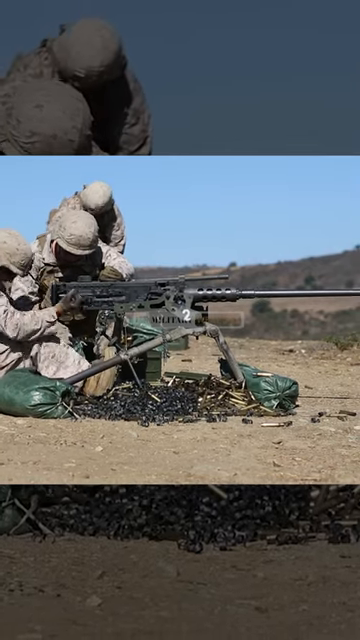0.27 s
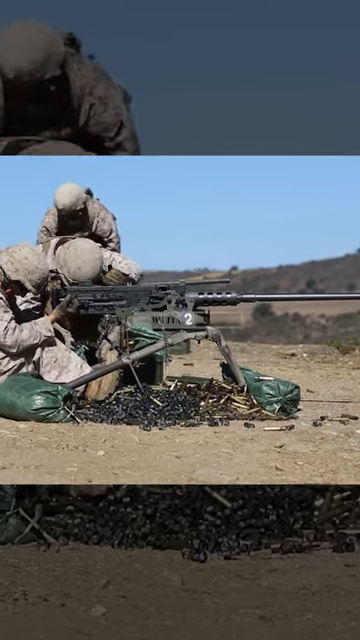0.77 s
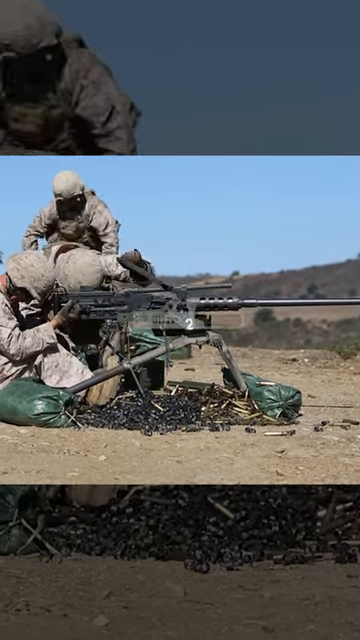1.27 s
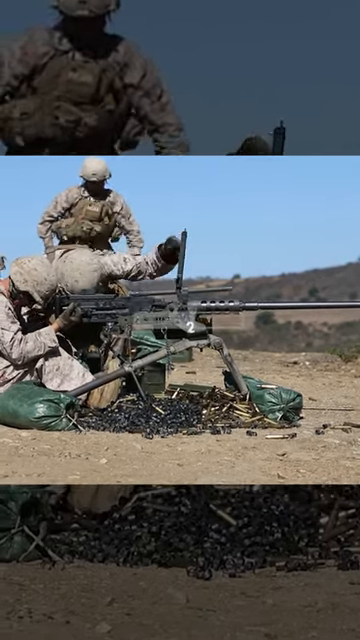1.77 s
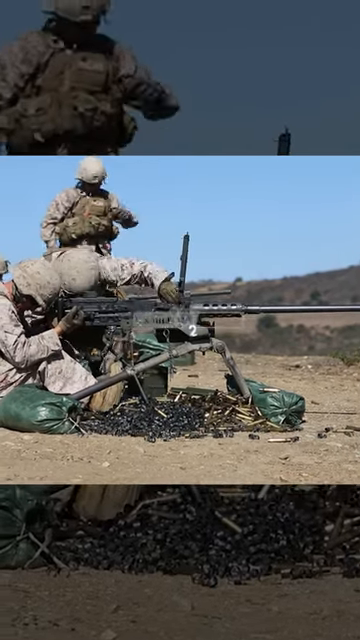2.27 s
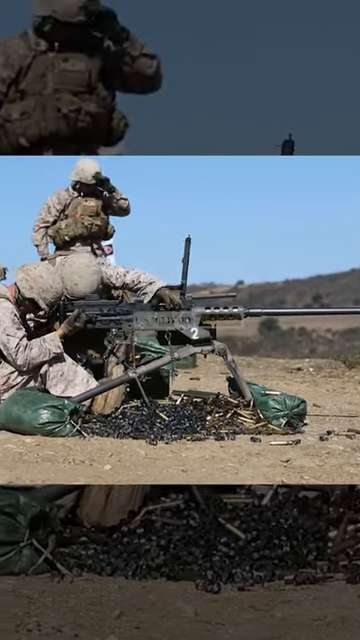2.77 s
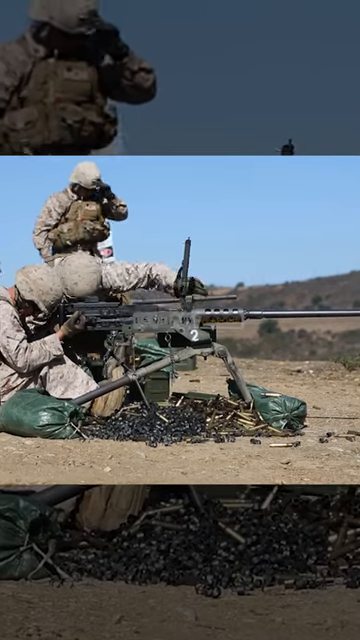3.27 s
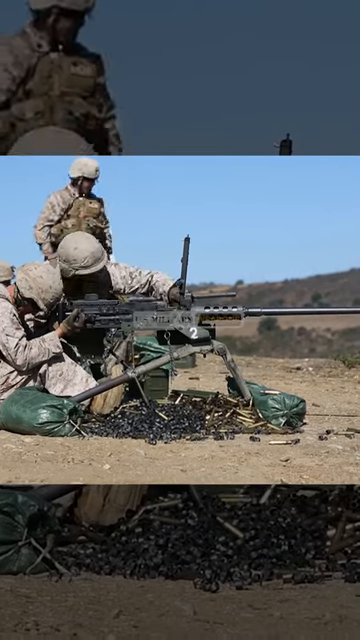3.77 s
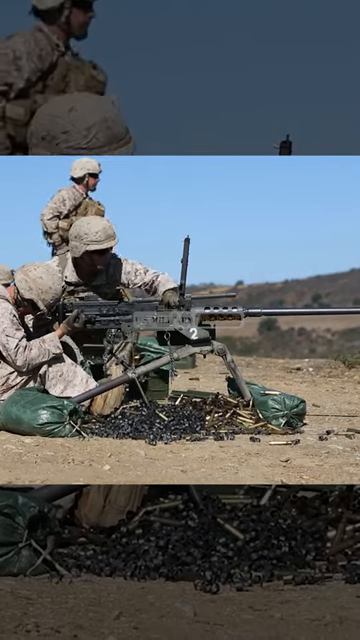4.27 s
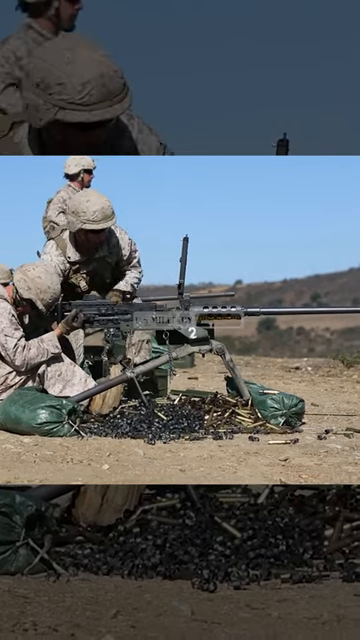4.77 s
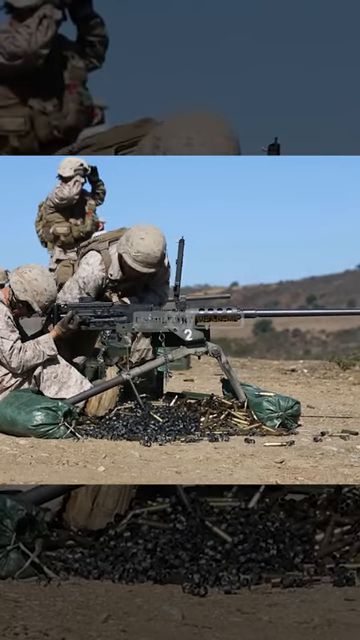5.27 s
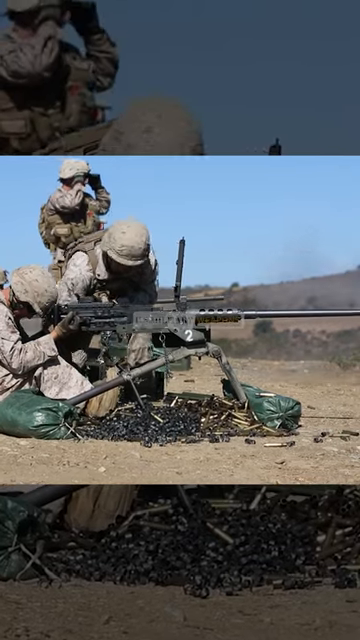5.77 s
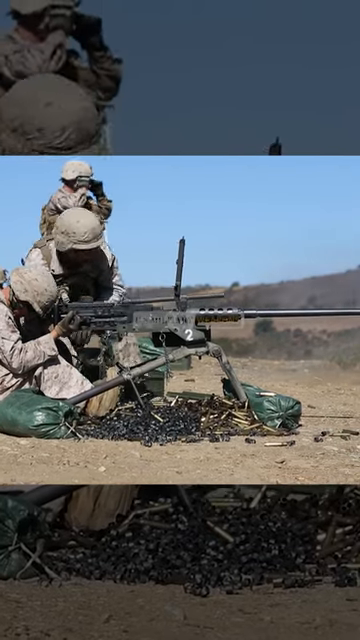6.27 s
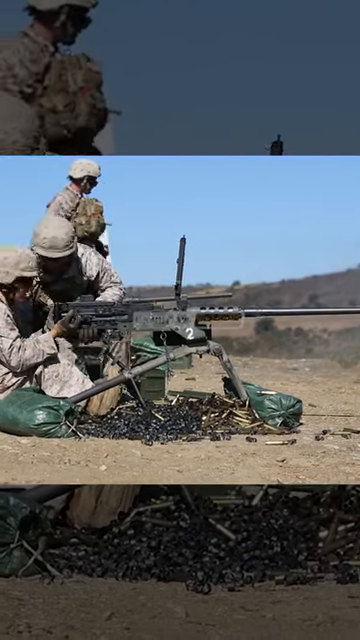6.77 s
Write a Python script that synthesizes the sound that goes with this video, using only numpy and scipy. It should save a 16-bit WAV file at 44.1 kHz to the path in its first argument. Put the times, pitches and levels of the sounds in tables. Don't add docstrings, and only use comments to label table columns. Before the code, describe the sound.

Hard steel clacks, scrapes and snapping latches on a heavy machine gun, tinkling brass, a quiet gap, then an overloaded eleven-shot burst outdoors.

```python
import sys
import numpy as np
from scipy import signal
from scipy.fft import rfft, irfft
from scipy.io import wavfile
from scipy.ndimage import uniform_filter1d

SR = 44100
rng = np.random.default_rng(int(sys.argv[2]) if len(sys.argv) > 2 else 0)


def decibels_to_gain(level_db):
    exponent = np.asarray(level_db, float) / 20
    return 10 ** exponent


def to_wav(s):
    ch = np.atleast_2d(s).T
    pcm = np.round(np.clip(ch, -1, 1) * 32767)
    wavfile.write(sys.argv[1], SR, pcm.astype(np.int16))


N = 309141


def noise():
    return rng.standard_normal(N)


def filtered(x, order, hz, kind="low"):
    return signal.sosfilt(signal.butter(order, hz, kind, fs=SR, output="sos"), x)


def band(x, lo_hz, hi_hz):
    return filtered(x, 2, [lo_hz, min(hi_hz, .45 * SR)], "band")


def level(x, db):
    return x * decibels_to_gain(db) / np.sqrt(np.mean(x ** 2))


def fade60(t, t60):
    return np.exp(-np.log(1000) * t / t60)


def ring(modes, seconds, pitch=1):
    t = np.arange(int(seconds * SR)) / SR
    return sum(decibels_to_gain(db) * np.sin(2 * np.pi * hz * pitch * t) * fade60(t, t60) for hz, db, t60 in modes)


def add(out, s, x):
    i = max(int(s * SR), 0)
    out[i:i + len(x)] += x[:N - i]


def walk(rate):
    k = int(SR / rate)
    steps = np.repeat(rng.standard_normal(N // k + 1), k)
    return 1.13 * uniform_filter1d(uniform_filter1d(steps, k), k)[:N]


# frequency in Hz, level in dB per Hz.
AIR_SPECTRUM = [(12, -41.5), (20, -12), (81, -6.5), (172, -5), (198, -8), (228, -7), (255, -12.5),
                (301, -11), (388, -19), (446, -16.5), (849, -24), (1710, -32.5), (12800, -44.5),
                (14700, -42), (16000, -70)]


def air():
    hz = np.maximum(np.fft.rfftfreq(N, 1 / SR), 1)
    curve_hz, curve_db = np.transpose(AIR_SPECTRUM)
    shape = decibels_to_gain(np.interp(np.log(hz), np.log(curve_hz), curve_db))
    bass_lift = 1 + (75 / np.maximum(hz, 25)) ** 2
    hiss = irfft(rfft(noise()) * shape * bass_lift, N)
    return level(hiss, -36.6) * decibels_to_gain(0.39 * walk(1.49))


# time in seconds, level in dB.
WIND_LEVELS = [(0, -48), (.37, -73), (.62, -50), (1.2, -53), (1.45, -48), (1.95, -56), (2.34, -44),
               (2.8, -73), (3.6, -54), (5.13, -46.5), (5.6, -52), (6.55, -62), (6.85, -55), (7.01, -62)]


def wind():
    times, levels_db = np.transpose(WIND_LEVELS)
    wind_db = np.interp(np.arange(N) / SR, times, levels_db, -60, -60)
    return level(band(noise(), 33, 88.5), 0) * decibels_to_gain(wind_db + 11.5 + 1.5 * walk(6.67))


# centre in Hz, width in Hz, level in dB.
WHINES = [(824, 68, -61.5)]


def engine_whine():
    return sum(level(band(noise(), hz - width / 2, hz + width / 2), db) for hz, width, db in WHINES)


# time in seconds, rate in Hz.
IDLE_RATES = [(0, 22.6), (.5, 23.2), (1.14, 22.7), (3.0, 22.85), (3.9, 22.6), (4.4, 22.3), (5.4, 22.3)]
# multiple of the firing rate, rms level in dB.
IDLE_ORDERS = [(3, -58), (4, -51), (5, -51), (6, -57), (7, -54), (8, -47), (9, -58), (10, -46.5), (11, -58),
               (12, -60), (13, -56), (14, -57), (15, -60), (16, -56)]


def engine_idle():
    times, rates_hz = np.transpose(IDLE_RATES)
    rate_hz = np.interp(np.arange(N) / SR, times, rates_hz) * (1 + .002 * walk(6))
    phase = 2 * np.pi * np.cumsum(rate_hz) / SR
    out = np.zeros(N)
    for order, db in IDLE_ORDERS:
        tone = np.sin(round(order) * phase + 2 * np.pi * rng.random())
        out += np.sqrt(2) * decibels_to_gain(db + 1.8 * walk(3)) * tone
    return out


def squeak():
    start_s, length_s, hz, width_hz, rub_db = 4.5, 0.5, 2200, 260, -61
    swell = np.sin(np.pi * np.clip((np.arange(N) / SR - start_s) / length_s, 0, 1))
    return level(band(noise(), hz - width_hz / 2, hz + width_hz / 2), rub_db) * swell


# start in seconds, end in seconds, level in dB.
SCRAPES = [(0.031, 0.079, -54.5), (.2, 0.429, -46.5), (.445, 0.511, -53.5), (1.249, 1.309, -54),
           (1.33, 1.386, -47.5), (1.465, 1.5, -44), (1.5, 1.619, -41), (1.642, 1.751, -54.5),
           (1.76, 1.785, -52), (1.785, 1.833, -46), (1.871, 1.945, -42), (1.945, 2.0, -48),
           (2.068, 2.134, -44.5), (2.15, 2.299, -58), (2.305, 2.325, -45), (2.325, 2.385, -40),
           (2.385, 2.43, -36), (2.44, 2.58, -53.5), (2.578, 2.751, -46), (2.759, 2.8, -50),
           (2.83, 2.88, -55), (3.165, 3.25, -53), (3.25, 3.37, -56), (4.451, 4.801, -66)]


def slide_power():
    grip_s, let_go_s, let_go_db = .004, 0.033, -19
    slides = np.zeros(N)
    for start, end, db in SCRAPES:
        t = np.arange(0, end - start + let_go_s, 1 / SR)
        gripping = 1 - t / grip_s
        letting_go = np.maximum(t - end + start, 0) / let_go_s
        add(slides, start, decibels_to_gain(db + let_go_db * np.maximum(gripping, letting_go)) ** 2)
    tilt_db = np.array([[-3], [0], [-6]])
    stutter_db = 4.6 * walk(60) + 3.0 * walk(250)
    return slides * decibels_to_gain(-2 + stutter_db + tilt_db) ** 2


def slide_clicks():
    clicks_per_s, t60 = 520, .018
    out = np.zeros(N)
    for start, end, db in SCRAPES:
        for when, size, a, b in rng.random((int(clicks_per_s * (end - start)) + 1, 4)):
            click_db = db - 3 - 2.5 * np.log(size + 0.024)
            low = (550 * 12.0 ** a, click_db, t60)
            high = (2100 * 7.0 ** b, click_db - 4.0, .7 * t60)
            add(out, start + when * (end - start), ring([low, high], .03))
    return out


# time in seconds, level in dB,
# weight in dB (heavy is dull, light is bright), note in Hz.
BOLT_BLOWS = [(.008, -32, 2, 2820), (.017, -31.5, -5, 5840), (.1703, -32.5, -4, 3420),
              (.2057, -25, -3, 2870), (.222, -34, 5, 2640), (.2275, -25, 0, 2800), (.2305, -17.5, 1, 1380),
              (.255, -33, -2, 3910), (.32, -30, -3, 4500), (.356, -32, -3, 6000), (.425, -27, -2, 3000),
              (.2905, -23, -3, 3000), (.2935, -9, -0.5, 1520), (.3298, -11, -3.5, 2100),
              (.3731, -23, -2.5, 3200), (.388, -25, -2.5, 3030), (.4108, -8.5, -1.5, 1950),
              (.439, -30, -5, 2000), (.508, -40, 6, 2060), (.5733, -39, 3, 2000)]
COVER_BLOWS = [(1.254, -34, -5, 3300), (1.277, -39, -1, 4500), (1.3269, -16, -5, 4200),
               (1.337, -23, -5, 4650), (1.365, -30, -2.5, 4800), (1.382, -37, 5, 2060),
               (1.4559, -16, -4, 3900), (1.5028, -19, -1, 3300), (1.506, -15, -1, 1500),
               (1.5534, -31, 0, 1570), (1.58, -23, -6, 1680), (1.5916, -10.5, -1, 1190),
               (1.6744, -43.5, 2, 1870), (1.7598, -35, 7, 1660), (1.795, -38, 6, 1710),
               (1.811, -35, 3, 1220), (1.8455, -11.5, -1.5, 3130), (1.863, -12.5, -1, 3230),
               (1.905, -33.5, 6, 1940), (1.93, -34, 4, 1020), (1.9636, -43, 8, 1910)]
LATCH_BLOWS = [(2.0683, -44, 9, 1620), (2.0856, -41, 2, 3400), (2.102, -37, 0, 3500), (2.16, -44, 4, 2100),
               (2.2, -41, 4, 2000), (2.107, -33.5, -7, 6130), (2.1277, -37.5, -1.5, 2720),
               (2.195, -42, 4, 5700), (2.22, -37, 8, 1400), (2.268, -43, 2, 1880), (2.3018, -35, 2.5, 1140),
               (2.3289, -18, 0, 1790), (2.345, -29, -3, 1500), (2.376, -33, 5, 1520),
               (2.3952, -25, -3, 2650), (2.4062, -10, 1.5, 2660), (2.4753, -36, 0, 2740),
               (2.578, -39, -3, 5560), (2.5882, -34.5, 7, 2720), (2.6138, -21.5, -0.5, 2930),
               (2.63, -26, -1, 3000), (2.641, -28, 0, 1380), (2.689, -13.5, -0.5, 2950),
               (2.6935, -16.5, -2, 3400), (2.7397, -32, -1, 2700), (2.767, -42, 6, 1930),
               (2.79, -45, 0, 1020), (2.835, -44, -1, 6560)]
BELT_BLOWS = [(3.0855, -38.5, 0, 2800), (3.1348, -52, 1, 2700), (3.1633, -46, -8, 2680),
              (3.1803, -41, -2, 5700), (3.187, -41, -6, 2580), (3.199, -41, -5, 2700),
              (3.218, -46, -7, 5430), (3.2316, -36, -4, 2680), (3.245, -46, 2, 2700),
              (3.274, -50, -3, 4500), (3.317, -42, -2, 5930), (3.349, -52, -7, 2780), (4.458, -42, 4, 1800),
              (4.924, -43, -3, 6500)]
# start in seconds, end in seconds, first tick in dB, last tick in dB,
# note in Hz.
CHATTERS = [
    (1.823, 1.841, -30, -12, 1990),
    (2.652, 2.677, -22, -13.5, 3180),
]


def blow_list():
    blows = BOLT_BLOWS + COVER_BLOWS + LATCH_BLOWS + BELT_BLOWS
    rebounds = []
    for s, db, weight, hz in blows:
        if db > -16 and weight > -5:
            rebounds.append((s + .019, db - 17.5, 1.5, 1.6 * hz))
    blows = blows + rebounds
    for start, end, first_db, last_db, hz in CHATTERS:
        for k, s in enumerate(np.arange(start, end, .004)):
            tick_db = first_db + (last_db - first_db) * np.sqrt((s - start) / (end - start))
            blows.append((s, tick_db, -1.5 - 1.8 * (-1) ** k, hz))
    return blows


def strike_parts():
    t = np.arange(6000) / SR
    onset = 1 - np.exp(-t / 0.0008)
    power, parts = np.zeros((3, N)), np.zeros(N)
    for s, db, weight, hz in blow_list():
        heavy, light = max(weight, 0), min(weight, 0)
        t60 = max(.066 - .0006 * (db + 10) + .0028 * weight, .015)
        body_db = db - 4.4 + 0.57 * heavy + 1.74 * light
        edge_db = db - 9.0 - 1.1 * heavy - 0.72 * light
        tick = decibels_to_gain(1.2) * np.exp(-t / 0.0022)
        rattle = decibels_to_gain(-.3) * fade60(t, t60)
        rustle = decibels_to_gain(-32) * np.exp(-t / 0.017)
        shape = onset * (tick + rattle + rustle)
        for layer, layer_db in zip(power, (body_db, db - 3.1, edge_db)):
            add(layer, s - .0008, (decibels_to_gain(layer_db) * shape) ** 2)
        notes = [(hz, db - 2.5, .35 * t60)]
        for a, b in rng.random((3, 2)):
            notes.append((1000 * 7.0 ** a, db - 5.5 - 8 * b, .25 * t60))
        add(parts, s, ring(notes, .1) * onset[:SR // 10])
    return power, parts


# centre in Hz, width in Hz, level in dB.
STEEL = [(610, 184, 4), (735, 244, 1.5), (1380, 550, -0.5), (2016, 160, 3), (2870, 1500, -2.5),
         (3370, 190, -4), (4140, 200, -17)]


def steel(x):
    return sum(decibels_to_gain(db) * band(x, hz - width / 2, hz + width / 2) for hz, width, db in STEEL)


def low_body(x):
    return band(steel(x) + decibels_to_gain(1.0) * x, 297, 1680)


def middle(x):
    return band(band(steel(x) + decibels_to_gain(15) * x, 950, 7000), 650, 6800)


def bright_edge(x):
    return band(x, 5200, 13600)


def handling():
    power, parts = strike_parts()
    power += slide_power()
    grit = noise() * decibels_to_gain(1.47 * walk(900))
    out = parts * decibels_to_gain(2.1 * walk(300))
    for colour, layer in zip((low_body, middle, bright_edge), power):
        out += colour(grit * np.sqrt(layer)) / np.std(colour(grit[:SR]))
    return out


# time in seconds, level in dB, lowest note in Hz.
JINGLES = [(.017, -37, 7070), (1.5803, -30, 7000), (1.675, -48, 7000), (1.69, -46, 8000), (1.70, -49, 8000),
           (1.78, -50, 8000), (1.797, -48, 7000), (1.814, -44, 8000), (2.07, -46, 9000),
           (2.107, -33, 10500), (2.118, -42, 10000), (2.128, -42, 10000), (2.195, -46, 10100),
           (2.27, -50, 9000), (2.3954, -30, 8000), (2.483, -48, 4000), (2.578, -48, 10000),
           (2.775, -48, 6000), (3.09, -60, 6900), (3.163, -41, 10000), (3.187, -42, 10000),
           (3.2, -48, 9000), (3.219, -44, 7000), (3.232, -39, 10000), (3.275, -52, 8000),
           (3.322, -48, 10000), (3.356, -56, 4970), (6.71, -53, 9000), (6.88, -53, 9000)]


def jingles():
    out = np.zeros(N)
    for s, db, low_hz in JINGLES:
        grid_hz = np.linspace(low_hz, 15200, 8)
        gap_hz = grid_hz[1] - grid_hz[0]
        notes = []
        for hz, (a, b) in zip(grid_hz, rng.random((7, 2))):
            notes.append((hz + a * gap_hz, db - 8.0 * b, .04 * (.5 + a)))
        add(out, s, ring(notes, .06, 0.96))
    return out


# frequency in Hz, level in dB, t60 in seconds.
PIN = [(3300, -18, .2), (5706, -9, .9), (10510, 0, .2), (10780, -5, .17), (12960, -7, .2), (14160, -4, .9),
       (14810, -6, .5)]
LINK = [(3850, -10, .8), (4200, -16, .4), (7190, -2, .4), (7671, -11, .4), (8016, -12, .4), (10610, -1, .3),
        (10869, -4, .4), (12274, -7, .25), (13011, -10, .5), (13980, 0, .3), (14357, 0, .2),
        (15009, -3, .25)]
CASE = [(4963, -6, .5), (6230, -10, .3), (6385, -4, .3), (8909, -5, .15), (11590, -5, .2), (12100, -12, .2),
        (14070, -10, .1), (15370, -8, .1)]
SHELL = [(6250, -7, .5), (8877, -11, .5), (10515, -2, .4), (11550, -5, .3), (12100, -1, .6),
         (14045, -7, .4), (15283, -4, .5)]
HINGE = [(4786, -4, .4), (5749, -5, .8), (6315, -4, .5), (7122, -4, .5), (8667, -6, .5), (10560, -3, .5),
         (10830, -6, .3), (12120, -2, .6), (12600, -6, .2), (13990, -5, .6), (14800, -3, .6)]
# time in seconds, level in dB.
PIN_HITS = [(2.108, -49), (2.195, -37), (2.21, -44), (2.41, -48), (2.48, -54), (3.163, -53)]
LINK_HITS = [(2.52, -58), (3.233, -40), (3.275, -57), (3.295, -47), (3.325, -50)]
CASE_HITS = [(4.922, -43), (5.515, -48), (5.74, -42), (6.715, -58), (6.78, -53), (6.83, -54)]
SHELL_HITS = [(5.95, -48), (6.2, -52), (6.42, -54), (6.89, -53), (6.94, -57)]
HINGE_HITS = [(1.865, -47), (1.95, -58), (2.021, -66), (2.33, -50), (2.44, -53), (2.55, -62)]


def chimes():
    out, span = np.zeros(N), np.linspace(0, 1, int(.13 * SR))
    fade = np.cos(span * np.pi / 2)
    loose_parts = ((PIN, PIN_HITS), (LINK, LINK_HITS), (CASE, CASE_HITS), (SHELL, SHELL_HITS),
                   (HINGE, HINGE_HITS))
    for modes, hits in loose_parts:
        for s, db in hits:
            for hz, part_db, t60 in modes:
                waver_db = np.interp(span, np.linspace(0, 1, 9), 3.5 * rng.standard_normal(9))
                waver_db += 1.2 * rng.standard_normal()
                add(out, s, ring([(hz, db + part_db - 1.5, t60)], .13) * decibels_to_gain(waver_db) * fade)
    return out * decibels_to_gain(2.5 * walk(60))


# time in seconds, note in Hz, level in dB, t60 in seconds. Latch tones, panels
SINGLE_RINGS = [(.375, 7020, -46, .3), (0.44, 7020, -46, 0.22), (.375, 7500, -29, .025),
                (.509, 8050, -46, .08), (1.964, 1920, -30, 0.038), (2.764, 1950, -36, .09),
                (3.319, 5916, -34, 0.13), (3.326, 5950, -36, 0.11), (.4115, 740, -9, 0.036),
                (0.292, 568, -11.5, 0.046), (.2935, 332, -20, 0.058), (2.86, 560, -33, .06),
                (2.95, 520, -35, .06), (2.075, 580, -29, .06), (5.4, 1600, -59, .5),
                (4.527, 2750, -50, 0.056), (4.904, 6400, -44, 0.065), (6.865, 270, -20, 0.056),
                (6.957, 230, -21, 0.07), (6.85, 200, -26, .06),
                (2.55, 7120, -49, .12), (2.77, 7200, -44, .06), (3.163, 10800, -42, .12),
               (3.163, 14400, -44, .08), (3.18, 7150, -44, .05), (3.27, 3850, -52, .6),
               (4.93, 6300, -50, .3), (3.3, 4200, -52, .3), (3.32, 3000, -54, .4), (3.322, 7190, -46, .2),
               (3.325, 10610, -49, .15), (3.345, 5920, -48, .15), (6.715, 6250, -55, .9),
               (6.715, 8877, -60, .9), (6.715, 11600, -59, .7), (6.75, 12200, -61, .8),
               (1.968, 7200, -42, .05), (1.955, 12120, -54, .4), (2.395, 12500, -30, .03),
               (.294, 4600, -20, .025), (.231, 2800, -25, .02), (.412, 3000, -21, .02),
               (.574, 1330, -33, .04),
                (.23, 653, -26, .05), (.23, 1340, -21, .04), (.33, 2030, -21, 0.058), (.574, 2700, -38, .03),
               (.206, 2800, -25, .03), (4.458, 2200, -50, .03), (4.458, 5300, -52, .03),
               (1.336, 2800, -29, .04), (1.364, 760, -36, .04), (1.383, 620, -32, .05),
               (1.383, 3500, -40, 0.034), (1.504, 623, -25, 0.056), (1.506, 1370, -25, 0.064),
               (1.553, 1610, -35, 0.045), (1.566, 1900, -35, .04), (1.574, 1650, -36, .04),
               (1.592, 757, -20, .05), (1.6, 1303, -26, 0.045), (1.612, 1770, -28, 0.054),
               (1.845, 566, -21, 0.045), (1.864, 580, -24, 0.063), (2.09, 3480, -44, .08),
               (2.1, 2800, -39, 0.11), (2.126, 2790, -38, .04), (2.16, 2100, -48, .03),
               (2.33, 1900, -26, .05), (2.665, 905, -23, .05), (2.675, 650, -22, .06),
               (2.69, 603, -23, 0.07), (2.72, 617, -40, .15), (2.8, 1950, -46, .1), (2.83, 2000, -47, .05),
               (3.086, 2730, -40, .05), (3.136, 2750, -52, .05), (4.742, 800, -45, .05)]


def lone_rings():
    out = np.zeros(N)
    for s, hz, db, t60 in SINGLE_RINGS:
        add(out, s, ring([(hz, db, t60)], .15))
    return out * decibels_to_gain(2.5 * walk(60))


def rumble():
    t = np.arange(N) / SR
    fade = sum((t > s) * np.exp(-np.maximum(t - s, 0) / .023) for s, *_ in SHOTS)
    return level(band(noise(), 150, 1160) * decibels_to_gain(5.1 * walk(90)), -6.5) * fade


def hills():
    t = np.arange(N) / SR
    bumps = sum(np.exp(-((t - s - 1.8) / .02) ** 2) for s, *_ in SHOTS)
    swell = np.clip((t - SHOTS[0][0] - 1.19) / .03, 0, 1)
    dull = band(band(noise(), 600, 1950), 300, 2250)
    bright = decibels_to_gain(-19) * band(noise(), 2200, 5600)
    roll = level((dull + bright) * decibels_to_gain(1.5 * walk(79)), 1.3)
    return roll * swell * decibels_to_gain(-39 + 7 * bumps)


# delay in seconds, level in dB, top in Hz, treble in dB.
SLAPS = [
    (.0925, -18.5, 900, -11),
    (0.116, -34, 1460, -5),
    (.187, -31, 800, -14),
]


def slaps(shots):
    smear = rng.standard_normal(1200) * np.exp(-np.arange(1200) / SR / 0.0096)
    smear[0] = 17
    rough = signal.fftconvolve(shots, smear / np.linalg.norm(smear))[:N]
    treble = band(band(rough, 410, 12400), 260, 15000)
    out = np.zeros(N)
    for delay, db, top_hz, treble_db in SLAPS:
        add(out, delay, decibels_to_gain(db) * (band(rough, 200, top_hz) + decibels_to_gain(treble_db) * treble))
    return out


# time in seconds, crack level in dB, crack pitch in Hz.
SHOTS = [(5.4485, 25, 3600), (5.5661, 25, 2700), (5.6777, 31, 3150), (5.7876, 28, 3190), (5.9000, 26, 2840),
         (6.0092, 22, 3370), (6.1184, 24, 3080), (6.2289, 28, 3360), (6.3351, 28, 3330), (6.4445, 24, 3210),
         (6.5539, 25, 3120)]
# delay in seconds, level in dB, pitch in Hz.
BOUNCES = [
    (.0022, 19.5, 1750),
    (.0056, 12, 1500),
]
# delay in seconds, pitch in Hz, level in dB,
# t60 in seconds.
BLAST_RINGS = [(.0004, 357.6, 6.5, 0.055), (.0055, 240, 6.5, 0.02), (.0008, 627, 8.5, 0.045),
               (.0008, 524, 8.5, 0.04), (.0025, 270, 7.5, 0.075), (.0025, 208, -6, 0.13),
               (.005, 141, -7, 0.15)]


def gun():
    out, t = np.zeros(N), np.arange(4410) / SR
    blast_db, gas_db, gas_after_s = 21, 17.5, .0017
    swell = 1 - np.exp(-np.maximum(t - gas_after_s, 0) / 0.0004)
    jet = swell * (np.exp(-t / 0.0035) + decibels_to_gain(-24) * np.exp(-t / 0.018))
    for s, crack_db, crack_hz in SHOTS:
        louder, sharper, later = rng.standard_normal(3)
        crack = -np.sin(2 * np.pi * crack_hz * t) * (t < .00085)
        turn = t / (0.00545 + 0.00012 * later)
        blast = np.sin(2 * np.pi * turn) * (turn < 1) * np.exp(-turn / 1.8)
        hiss = rng.standard_normal(len(t))
        gas = level(band(hiss, 315, 4400) + decibels_to_gain(-7.5) * hiss, 0)
        add(out, s, decibels_to_gain(crack_db) * crack + decibels_to_gain(blast_db) * blast + decibels_to_gain(gas_db) * jet * gas)
        for late, db, hz in BOUNCES:
            bounce = ring([(hz, db + 2.0 * louder, .008)], .004, 1 + .14 * sharper)
            add(out, s + late + .0002 * later, bounce)
        for late, hz, db, t60 in BLAST_RINGS:
            mode = (hz, db + 1.7 * rng.standard_normal(), t60)
            add(out, s + late, ring([mode], 0.17, 1 + 0.012 * sharper))
    return out


def scene():
    shots = gun()
    background = air() + wind() + engine_whine() + engine_idle()
    metal = squeak() + slide_clicks() + handling() + jingles() + chimes() + lone_rings()
    landscape = rumble() + hills() + slaps(np.clip(shots, -6.0, 6.0))
    return (background + metal + landscape + shots)[None]


def gain_db():
    t = np.arange(N) / SR
    first_s, last_s = SHOTS[0][0], SHOTS[-1][0]
    duck = -14 * (1 - np.exp(-np.maximum(t - first_s - .006, 0) / .12))
    since = np.maximum(t - first_s - .014, 0)
    jolt = -5 * (1 - np.exp(-since / .006)) * np.exp(-since / .04)
    climb = 30.5 * np.maximum(t - last_s - 0.047, 0)
    return duck + jolt + climb


def band_limit(x):
    return signal.sosfilt(signal.butter(12, 16390, fs=SR, output="sos"), x)


def record(dry):
    capsule = np.clip(dry, -decibels_to_gain(9.5), decibels_to_gain(7.5))
    coupled = np.clip(filtered(capsule, 1, 100, "high"), -decibels_to_gain(10.5), decibels_to_gain(10.5))
    load = filtered(np.maximum(np.abs(capsule) - 1, 0), 1, 45)
    sagged = coupled / (1 + .5 * np.maximum(load, 0))
    soft = filtered(sagged * decibels_to_gain(gain_db()), 2, 14000)
    converter = np.clip(filtered(soft, 2, 75, "high"), -.95, .95)
    mix = signal.sosfilt(signal.ellip(6, .2, 40, 15500, fs=SR, output="sos"), converter)
    return band_limit(mix)


dry = scene()
out = record(dry)
to_wav(out)
```